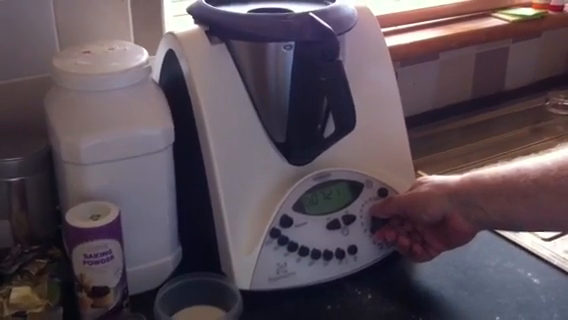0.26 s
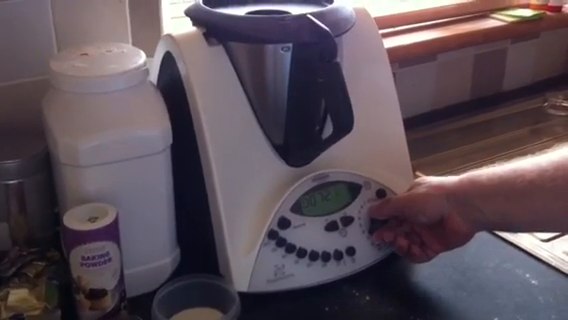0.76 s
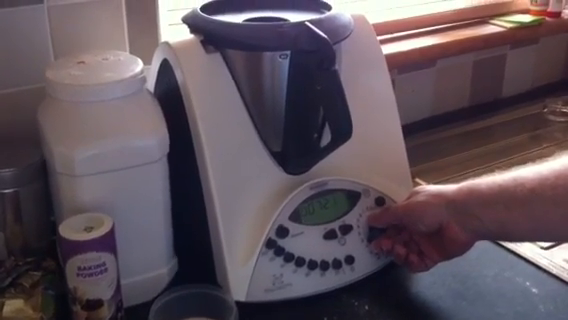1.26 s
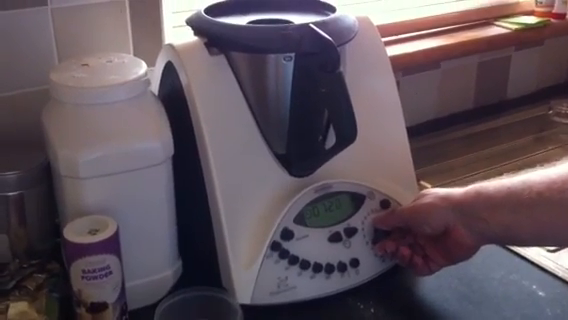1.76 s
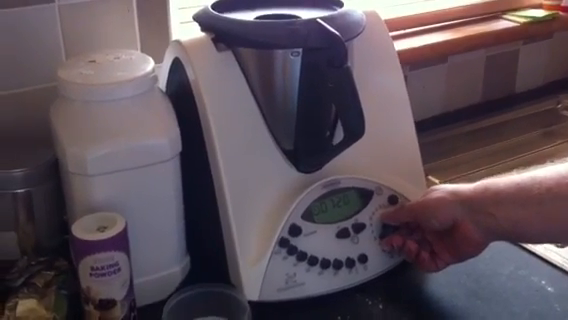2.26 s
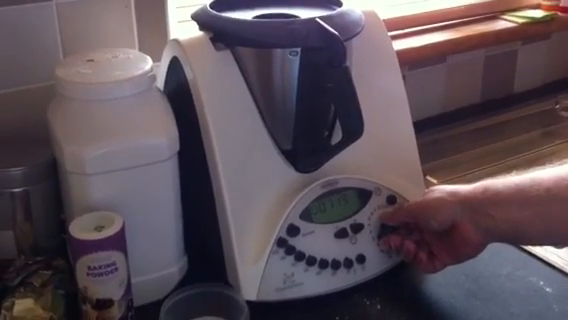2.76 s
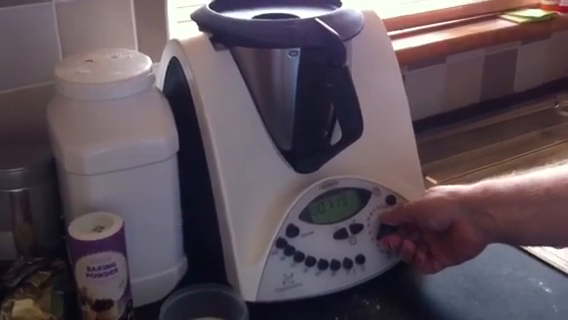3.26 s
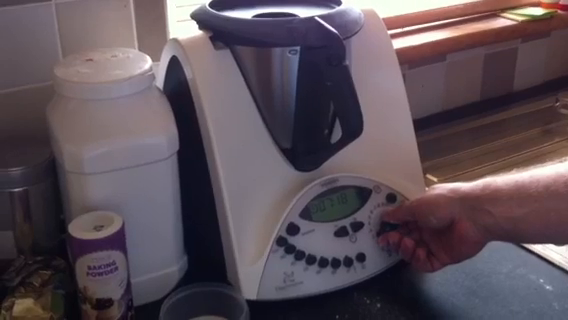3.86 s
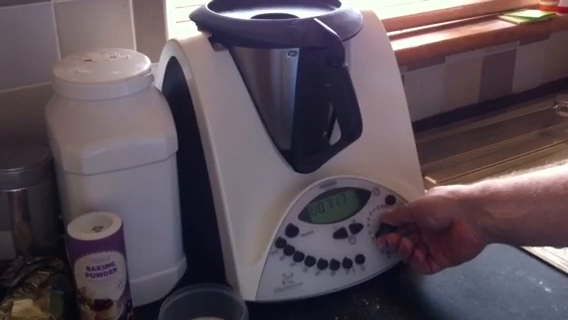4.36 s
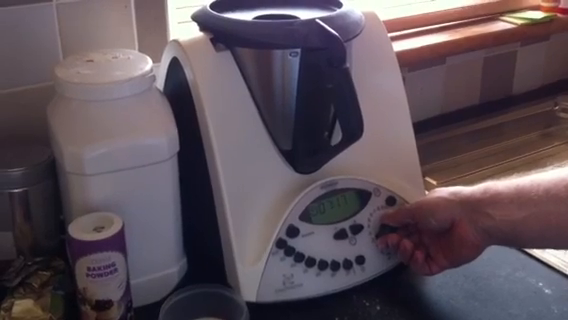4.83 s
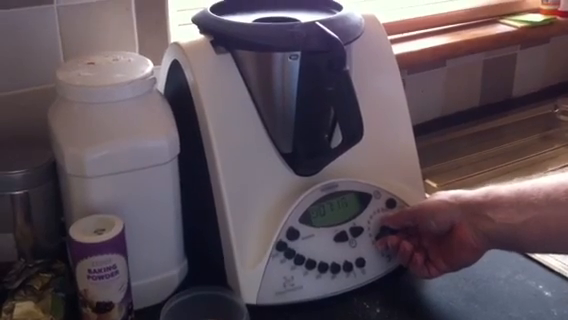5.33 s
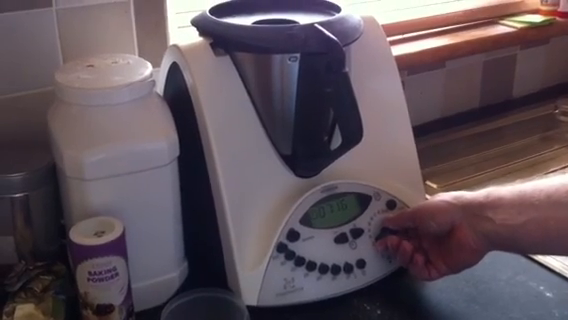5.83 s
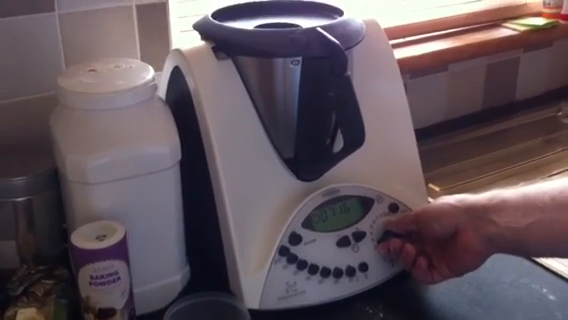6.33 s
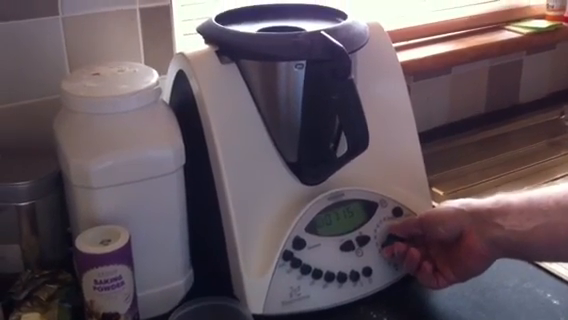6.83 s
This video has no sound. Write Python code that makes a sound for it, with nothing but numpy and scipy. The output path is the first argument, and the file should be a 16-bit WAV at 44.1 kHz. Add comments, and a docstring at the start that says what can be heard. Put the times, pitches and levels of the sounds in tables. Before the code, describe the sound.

In a quiet kitchen a food mixer's electric motor wakes with a faint falling whine, stirs in a slow throbbing rattle, then speeds up louder and humming.

```python
"""Faint clean tones over a quiet kitchen, then a mixer's electric motor wakes to a slow stir, heard close.
It is turned up with a dial. The drive chops the coil current in uneven pulses that ring iron and casing;
the ringing throbs with each pole stroke and turn. Noise rings the base and the metallic treble.
At the higher speed a wavering near-sine hum grows; a low growl and room noise with faint tones lie below."""
import sys
import numpy as np
from scipy import signal
from scipy.fft import rfft, irfft
from scipy.io import wavfile
from scipy.ndimage import uniform_filter1d

SR = 44100
rng = np.random.default_rng(int(sys.argv[2]) if len(sys.argv) > 2 else 0)


def inscribe(sig):
    """Save sig as 16-bit PCM at rate SR to the path in sys.argv[1].

    A 1-D sig is mono; a 2-D sig holds one channel per row.
    Samples are clipped to [-1, 1] before scaling.
    """
    pcm = np.round(np.clip(np.atleast_2d(sig).T, -1, 1) * 32767)
    wavfile.write(sys.argv[1], SR, pcm.astype(np.int16))


N = 312653   # samples

STROKES = 12   # pole strokes a turn
ATTACK_S, RELEASE_S = .004, .018
# current chopping: [t/s, mean pulse rate f/Hz, timing spread/share of a period]
CHOPPING_RATE = [(0, 207, .008), (.11, 205, .008), (.15, 195, .008), (.2, 184.5, .012), (.255, 156, .012),
                 (.3, 155, .014), (.33, 155, .03), (.4, 300, .25), (3.3, 450, .3), (3.6, 500, .14),
                 (3.88, 545, .12), (3.915, 560, .07), (3.985, 562, .07), (4.015, 637, .1), (4.13, 632, .1),
                 (4.35, 668, .1), (5, 700, .1), (7.1, 710, .11)]
# resonances left out while the drive changes step: [t/s, iron's top level/dB, upper casing level/dB]
STEP_SAG = [(3.98, 0, 0), (4.03, -9, -5), (4.16, -7, -5), (4.3, 0, -4), (4.52, 0, -4), (4.62, 0, 1)]
# the motor wakes, before each part takes its share: [t/s, level/dB re running]
MOTOR_WAKING = [(.06, -35), (.17, -24), (.22, -18.5), (.27, -14), (.33, -6), (.38, -1.5), (.5, 1)]


def from_db(db):
    """Amplitude gain of a level in dB."""
    return 10 ** (np.asarray(db) / 20)


def steady(x, seconds):
    """Hold the running rms at 1 over a window of the given length."""
    return x / np.sqrt(uniform_filter1d(x ** 2, int(seconds * SR)) + 1e-20)


def in_time(rows):
    """Columns of a curve, interpolated at every sample."""
    s, *columns = np.transpose(rows)
    return [np.interp(np.arange(N) / SR, s, c) for c in columns]


def drift(rate):
    """Slow random wander of spread 1: noise through two equal poles, faster for a higher rate in Hz."""
    step = 40   # samples between drawn points
    r = np.exp(-2 * step * np.pi * rate / SR)
    white = rng.standard_normal(N // step + 2002)
    slow = signal.lfilter([1], [1, -2 * r, r * r], white)[2000:]   # settled part
    return np.interp(np.arange(N) / step, np.arange(len(slow)), slow / slow.std())


def coloured(points):
    """Noise of rms 1 with a spectrum drawn through points over log frequency."""
    hz = np.maximum(np.arange(N // 2 + 1) * SR / N, 1)
    table = np.array(points)
    level_db = np.interp(np.log(hz), np.log(table[:, 0]), table[:, 1])
    x = irfft(rfft(rng.standard_normal(N)) * from_db(level_db), N)
    return x / x.std()


def resonance(x, hz, width_hz):
    """Two-pole resonance with a gain of about 1 at its peak."""
    r = np.exp(-np.pi * width_hz / SR)
    edge = (1 - r * r) / 2
    return signal.lfilter([edge, 0, -edge], [1, -2 * r * np.cos(2 * np.pi * hz / SR), r * r], x)


def note(start, length, attack, release):
    """Envelope: linear attack within the length, hold, exponential release."""
    t = np.arange(N) / SR - start
    return np.clip(t / attack, 0, 1) * np.exp(-np.maximum(t - length, 0) / release)


def chopping(turns, size_db):
    """Force on iron and casing: a click per current pulse over scrub, swelling with each pole stroke."""
    hz, spread = in_time(CHOPPING_RATE)
    # broadband scrub: -9 dB at a spread of 1%, 5 dB more per tenfold, up to a ceiling
    scrub_db = np.minimum(-9 + 5 * np.log10(100 * spread), -4.5)
    count = np.cumsum(hz * (1 + .35 * spread * drift(20))) / SR   # the rate itself wanders
    at = np.searchsorted(count, np.arange(int(count[-1])))
    luck = rng.standard_normal((len(at), 2)) * np.clip(spread[at], 0, .5)[:, None]
    # timing errors carry over from pulse to pulse, so the overtones are blurred bands
    slip = signal.lfilter([1], [1, -.8], luck[:, 0])
    at = np.clip(at + slip * SR / hz[at], 0, N - 1).astype(int)
    force = np.zeros(N)
    np.add.at(force, at, from_db(size_db * luck[:, 1]) * np.sqrt(SR / hz[at]))
    # the edges of a pulse are felt more than its mean
    force = signal.sosfilt(signal.butter(2, 850, "high", fs=SR, output="sos"), force)
    force = force + from_db(scrub_db) * rng.standard_normal(N)
    stroke_db = 2
    return force * from_db(stroke_db * np.cos(2 * np.pi * STROKES * turns))


def ringing(force, modes, turns):
    """Parallel resonances of alternating sign; by pitch they swell once a turn, fill in, sag or rattle."""
    # drive of the swelling resonances: [t/s, level/dB]
    throb_level = [(.21, -11), (.29, 1.5), (.8, -1), (3.15, -4), (3.25, -1.5), (4.5, 1.5), (7.1, 2.5)]
    # low resonances fill in when the drive changes step: [t/s, level/dB]
    filling = [(.5, -1), (1.2, -2), (3.1, -2), (3.9, 0.5), (4.05, -0.5), (7.1, -1)]
    # upper resonances rattle at speed: [t/s, swing once a stroke/dB, swing twice a stroke/dB]
    rattling = [(3.5, 0, 0), (4.8, 1.2, 1.2)]
    throb_db = 6.5   # dip once a turn
    once = in_time(throb_level)[0] - throb_db * np.sin(np.pi * turns) ** 4   # broad tops, short dips
    fill, = in_time(filling)
    iron_sag, casing_sag = in_time(STEP_SAG)
    single, double = in_time(rattling)
    stroke = 2 * np.pi * STROKES * turns
    rattle = single * np.cos(stroke) + double * np.cos(2 * stroke)
    rung = 0
    for k, (hz, width_hz, db) in enumerate(modes):
        level_db = db + once * (860 < hz < 990) + fill * (500 < hz < 800) + rattle * (hz > 1200)
        level_db = level_db + iron_sag * (1960 < hz < 2140) + casing_sag * (1200 < hz < 1650)
        rung = rung + from_db(level_db) * (-1) ** k * resonance(force, hz, width_hz)
    return steady(rung, 0.54)


def whine(waver_db):
    """The iron's main resonance as a wandering sine that wakes late and sags with the top of the iron."""
    pitch_hz, wander_hz, level_db = 2022, 14, -7   # level beside the iron's ringing
    phase = 2 * np.pi * np.cumsum(pitch_hz + wander_hz * drift(6.04)) / SR
    db = level_db + in_time(MOTOR_WAKING)[0] + in_time(STEP_SAG)[0] + waver_db * drift(7.8)
    return np.sqrt(2) * from_db(db) * np.sin(phase)


def yielding(base, hz, width_hz):
    """The base's noisy ring, turned down about the hum's pitch as it gives way to the hum."""
    # ring about the hum's pitch: [t/s, level/dB]
    base_yields = [(4.6, 0), (5.0, -8), (7.1, -8)]
    return base - (1 - from_db(in_time(base_yields)[0])) * resonance(base, hz, width_hz)


def treble(peaks_db, flicker_db):
    """A noise whirr of air and bearings, with narrow noise-rung metal resonances standing out of it."""
    # metal resonances: [f/Hz, width f/Hz, relative level/dB]
    metal = [(3150, 16, 3), (3444, 46, 0.5), (3596, 40, -3.5), (3720, 15, 0), (3810, 18, -4), (3894, 24, 2),
             (4000, 37, -11), (4710, 9.9, 5.5), (4820, 14, -0.5), (4800, 62, -9), (5050, 14, -6),
             (5280, 23, -9), (5445, 26, -3), (5750, 30, -4.5), (9100, 360, -18), (10260, 120, -7),
             (11300, 89, -21), (13300, 55, -28)]
    # air and bearings: [f/Hz, relative level per Hz/dB]
    whirr = [(1530, -41), (2600, -5), (3090, -7.5), (3900, -16), (4210, -14), (4850, -12), (5040, -15),
             (5680, -17.5), (7680, -33), (10400, -21), (11500, -16), (12500, -28), (15700, -48)]
    white = rng.standard_normal(N)
    peaks = sum(from_db(db) * (-1) ** k * resonance(white, hz, w) for k, (hz, w, db) in enumerate(metal))
    peaks = signal.sosfilt(signal.butter(4, 3000, "high", fs=SR, output="sos"), peaks)
    both = coloured(whirr) + from_db(peaks_db) * peaks / peaks.std()
    return steady(both, 0.49) * from_db(flicker_db * drift(17.0))


def hum(waver_db):
    """Pole-stroke hum: near sines that waver with the speed and come up as it nears its set value."""
    # hum hunting about its set pitch: [t/s, f/Hz, rms level/dB]
    hunting = [(4.86, 233.6, -36.5), (4.9, 232, -34), (5.0, 248.2, -34.5), (5.24, 246.6, -34.5),
               (5.29, 242.4, -30), (5.46, 246.8, -38.5), (5.52, 232.6, -34), (5.56, 232, -47),
               (5.58, 233.6, -31), (5.65, 239.3, -34.5), (5.84, 239.3, -30.5), (5.91, 230.4, -40),
               (5.93, 233, -30.5), (5.95, 240.6, -44), (5.98, 239.2, -31.5), (6.16, 248.5, -37.5),
               (6.17, 249, -44), (6.22, 239.4, -30.5), (6.28, 237.5, -34), (6.41, 248, -37),
               (6.42, 246, -43), (6.48, 231.7, -32), (6.51, 230.4, -45), (6.53, 232.8, -32.5),
               (6.61, 232.7, -33.5), (6.63, 230, -46), (6.65, 231.6, -40), (6.72, 236.1, -31),
               (6.78, 230.7, -35), (7.09, 247.0, -30)]
    # the hum and faint neighbours a third of its pitch apart: [multiple of the pitch, level/dB re hum]
    hum_orders = [(2 / 3, -26), (1, 0), (4 / 3, -25), (5 / 3, -26)]
    hz, db = in_time(hunting)
    early = np.maximum(hunting[0][0] - np.arange(N) / SR, 0)   # s before the first point
    db = db - 21 * early   # rises 21 dB per s
    hz = hz - 48 * early   # rises 48 Hz per s
    phase = 2 * np.pi * np.cumsum(hz + 1 * drift(11.7)) / SR
    return np.sqrt(2) * sum(from_db(db + rel_db + waver_db * drift(47.0)) * np.sin(k * phase)
                            for k, rel_db in hum_orders)


def start_whine(waver_db):
    """Clean tones of the start: six times the falling chopping rate, and the singing iron."""
    # the iron sings in the first current bursts: [t/s, length t/s, f/Hz, rms level/dB]
    iron_songs = [(-.01, .012, 2050, -50), (.068, .08, 2017, -46.5), (.16, .025, 1985, -53),
                  (.229, .1, 2019, -41.5), (.29, .04, 1945, -49)]
    hz = 6 * in_time(CHOPPING_RATE)[0]
    # flares by 19 dB at the casing resonance of 938 Hz
    db = -65 + 19 / (1 + ((hz - 938) / 36) ** 4)
    from_s, until_s = .1, .27
    heard = note(from_s, until_s - from_s, .04, ATTACK_S)
    sixth = heard * from_db(db + 4.7 * drift(30)) * np.sin(2 * np.pi * np.cumsum(hz) / SR)
    wander = np.cumsum(8 * drift(25)) / SR   # pitch wander of 8 Hz, as phase in cycles
    t = np.arange(N) / SR
    songs = sum(from_db(db) * note(s, length, ATTACK_S, RELEASE_S) * np.sin(2 * np.pi * (hz * t + wander))
                for s, length, hz, db in iron_songs)
    return np.sqrt(2) * (sixth + songs * from_db(waver_db * drift(27)))


def overtones(waver_db):
    """Wavering sines on multiples of the chopping rate that stand out clean for a moment."""
    # clean overtones: [multiple of the rate, start t/s, length t/s, rms level/dB]
    clean = [(9, -.05, .26, -68), (11, -.05, .22, -66), (2, 3.9, .085, -41), (3, 4.01, .2, -38)]
    phase = 2 * np.pi * np.cumsum(in_time(CHOPPING_RATE)[0] + 2 * drift(23)) / SR
    attack_s = 0.027
    total = 0
    for k, s, length, db in clean:
        level = from_db(db + waver_db * drift(25)) * note(s, length, attack_s, RELEASE_S)
        total = total + level * np.sin(k * phase)
    return np.sqrt(2) * total


def booms():
    """Short sine swells of the base's main tone."""
    # booms: [peak t/s, rms level at the peak/dB, f/Hz]
    base_booms = [(.29, -50, 259), (.37, -41.5, 241), (1.16, -40.5, 237.5), (2.08, -41, 236),
                  (2.65, -49, 243.3), (3.11, -39, 246.6), (4.082, -29, 237.1), (4.55, -38, 234)]
    t = np.arange(N) / SR
    rise_s, fall_s = 0.04, 0.038
    return np.sqrt(2) * sum(from_db(db) * note(s - rise_s, rise_s, rise_s, fall_s) * np.sin(2 * np.pi * hz * t)
                            for s, db, hz in base_booms)


def growl(hz, width_hz, flutter_db):
    """Noise twice through one low resonance of the counter top, below the hum."""
    # growl before its flutter: [t/s, rms level/dB]
    growl_level = [(.15, -82), (.48, -62), (1.3, -60), (2.45, -59), (3.4, -61), (7.0, -65)]
    db = in_time(growl_level)[0] + flutter_db * drift(1.2)
    once = resonance(rng.standard_normal(N), hz, width_hz)
    return from_db(db) * steady(resonance(once, hz, width_hz), 0.17)


def room():
    """The kitchen at rest: soft coloured noise and a few faint sines of drifting level."""
    # room noise: [f/Hz, relative level per Hz/dB]
    room_noise = [(25, 7.5), (60, 7.5), (130, -5), (220, -3.5), (440, -6), (610, -13.5), (1000, -11),
                  (1600, -18), (2030, -5), (3100, -26), (5900, -20), (7500, -21), (11500, -22),
                  (15700, -25.5)]
    # tones in the kitchen: [f/Hz, middle rms level/dB]
    room_tones = [(446.8, -69), (484.5, -72), (4730, -74)]
    t = np.arange(N) / SR
    tones = sum(from_db(db + 3 * drift(15)) * np.sqrt(2) * np.sin(2 * np.pi * hz * t) for hz, db in room_tones)
    noise_db = -56
    return from_db(noise_db) * coloured(room_noise) + tones


def scene():
    """Base, casing, iron and treble of the motor, its hum and passing tones, over the room."""
    # shaft angle: [t/s, angle/turns]
    shaft = [(0, -.6), (.5, 0), (2.9, 4), (3.35, 5), (3.75, 6), (4.15, 7), (4.5, 8), (4.83, 9),
             (7.1, 16.57)]
    # effort as the dial is turned, before each part takes its share: [t/s, level/dB]
    effort = [(.5, 1), (1.0, .5), (1.35, -1), (2.5, 1), (3.4, 2.5), (4.0, 4), (4.8, 6), (5.6, 5.5),
              (7.1, 5.5)]
    # the treble wakes sooner and more gently: [t/s, level/dB re running]
    treble_waking = [(.08, -13), (.18, -10), (.25, -4.5), (.36, -2.5), (.5, 0)]
    # resonances of base, casing and iron: [f/Hz, width f/Hz, relative level/dB]
    base_modes = [(208, 40, -11.5), (240.7, 19.4, -2), (288.8, 29.4, -14), (309.5, 48, -16), (363, 24, -19),
                  (397, 32, -18), (444.3, 17, -17.5), (508.6, 41, -21)]
    casing_modes = [(594, 90, -20.5), (753.6, 42, -10), (890, 12.3, 3.5), (923, 13.2, 3), (957.4, 15.7, 3),
                    (1046, 54, -10.5), (1109, 36, -3), (1147, 78, -6.5), (1360, 55, -9.5), (1463, 10.3, -2),
                    (1520, 33, -4), (1627, 47, -5), (1766, 20, -4.5), (1816, 17.5, -3.5)]
    iron_modes = [(1895, 69, -10.5), (1941, 26.7, -4.5), (1975, 14.5, -2), (2020, 30.4, -4),
                  (2090, 13.2, -7), (2125, 21, -10.5), (2306, 69, -17), (2556, 113, -21), (2643, 36, -18.5),
                  (2768, 83, -30)]
    # base, casing, iron, treble: [slow-stir level/dB, share of the waking, share of the effort]
    part_levels = [(-45, 0.91, 0.63), (-40, 0.88, 0.86), (-37, 0.77, 0.86), (-57, 1, 1.3)]
    turns, = in_time(shaft)
    effort_db, = in_time(effort)
    wakings = 3 * in_time(MOTOR_WAKING) + in_time(treble_waking)   # one curve for each part
    force = chopping(turns, size_db=2.0)
    base = yielding(ringing(rng.standard_normal(N), base_modes, turns), hz=238, width_hz=19)
    casing = ringing(force, casing_modes, turns)
    iron = ringing(force, iron_modes, turns) + whine(waver_db=2.5)
    parts = (base, casing, iron, treble(peaks_db=-3.5, flicker_db=0.5))
    motor = sum(from_db(db + wakes * waking_db + works * effort_db) * part
                for (db, wakes, works), part, waking_db in zip(part_levels, parts, wakings))
    lows = hum(waver_db=0) + booms() + growl(hz=177.3, width_hz=59, flutter_db=7.0)
    return (motor + start_whine(waver_db=1) + overtones(waver_db=2.0) + lows + room())[None]


def record(dry):
    """The microphone drops the bass below 140 Hz, and the top is cut steeply above 15.76 kHz."""
    thin = signal.sosfilt(signal.butter(3, 140, "high", fs=SR, output="sos"), dry)
    return signal.sosfilt(signal.ellip(12, .5, 60, 15760, fs=SR, output="sos"), thin)


dry = scene()
out = record(dry)
inscribe(out)
```